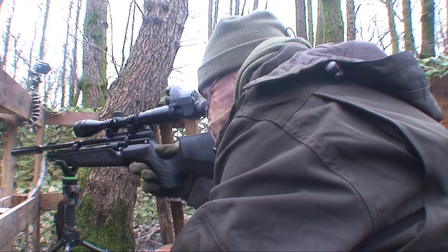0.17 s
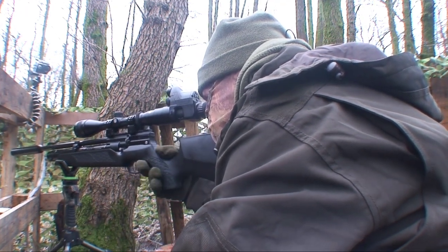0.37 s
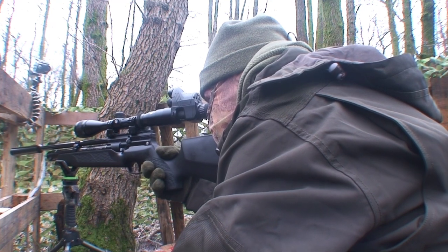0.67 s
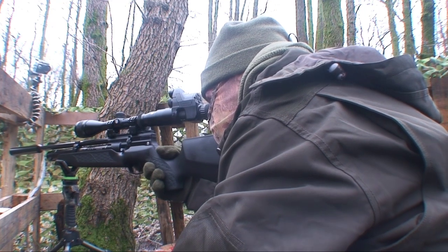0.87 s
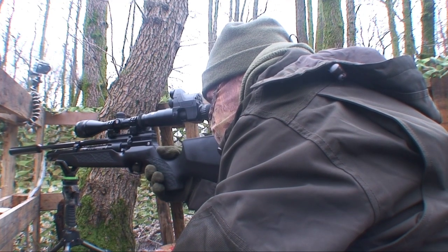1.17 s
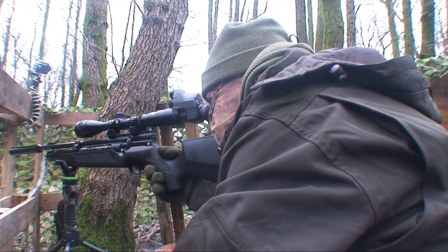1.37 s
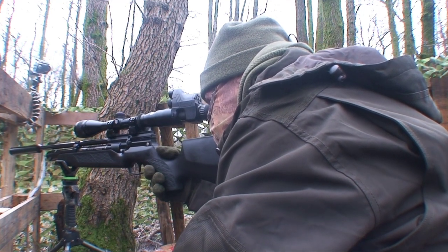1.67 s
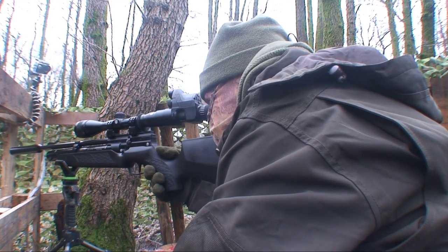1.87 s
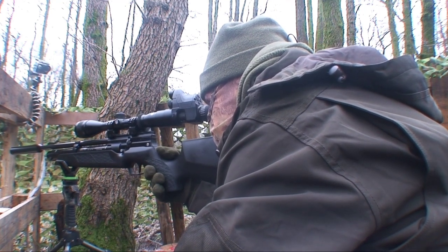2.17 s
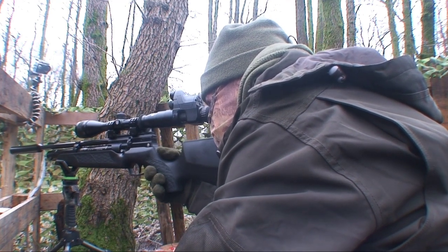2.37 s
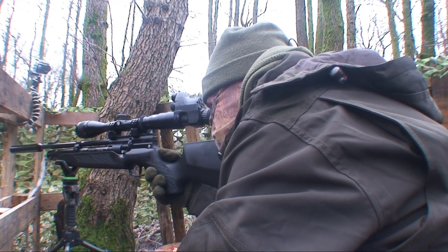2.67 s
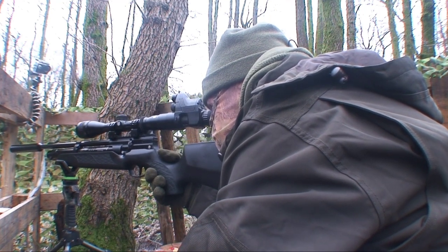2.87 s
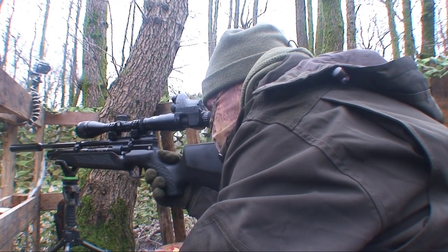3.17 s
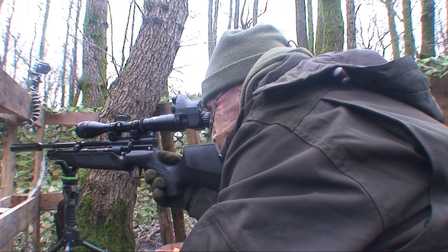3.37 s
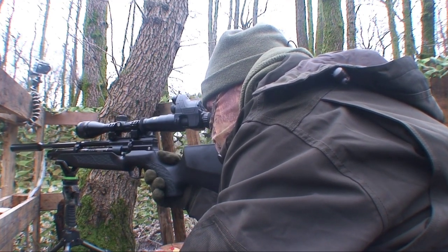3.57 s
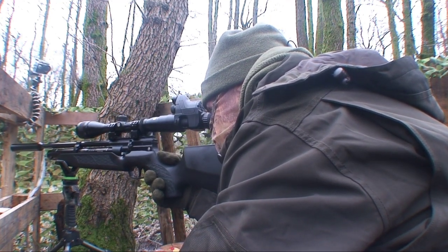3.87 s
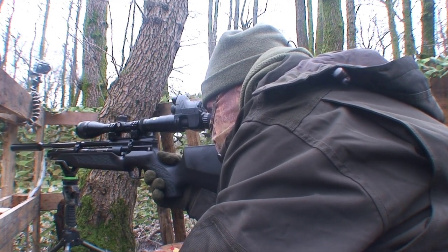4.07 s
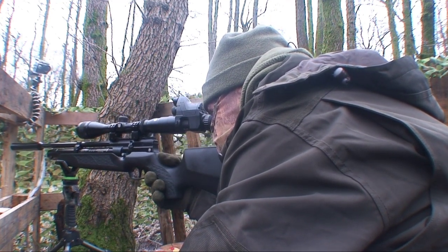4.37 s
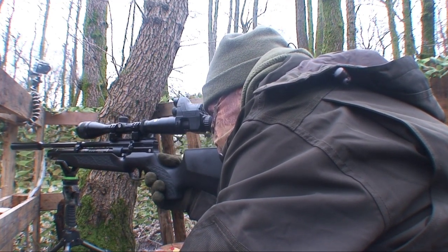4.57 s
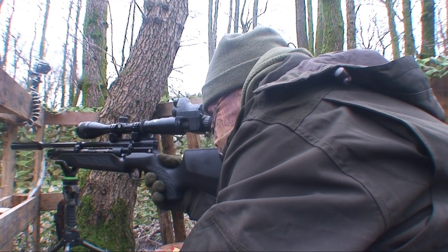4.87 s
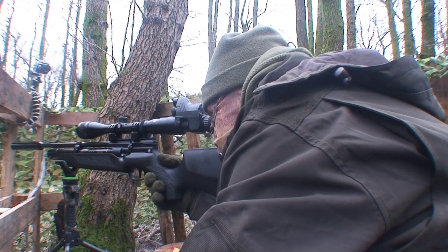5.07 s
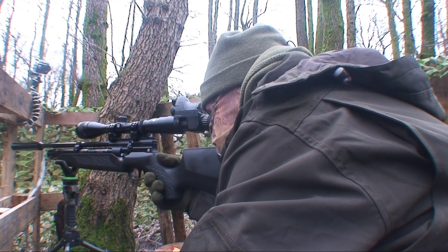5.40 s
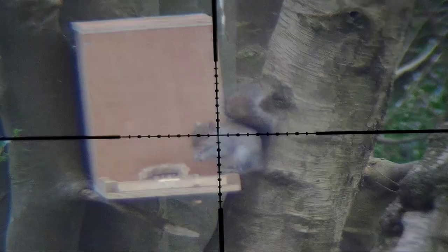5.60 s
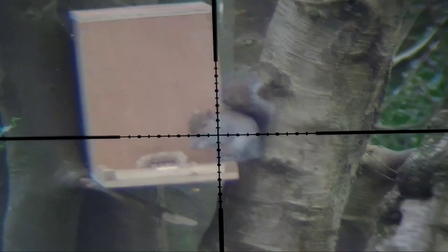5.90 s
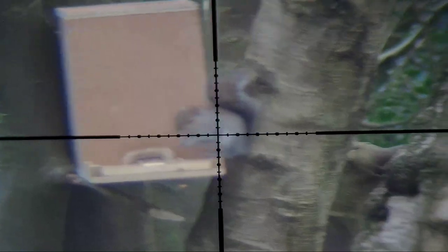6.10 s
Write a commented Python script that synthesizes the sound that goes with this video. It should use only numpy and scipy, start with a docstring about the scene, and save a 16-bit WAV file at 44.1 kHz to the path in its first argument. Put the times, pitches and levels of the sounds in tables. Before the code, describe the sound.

In still woodland, a soft distant roar and leafy hiss surround small birds: thin rasps, bright whistles, quick chirps and a scolding churr, busiest in the first two and a half seconds, echoing lightly among trunks. Then it grows sparse. Near the end the wide stereo air drops to a quieter, close mono microphone on an air rifle, whose action rattles, snaps loudly and ticks.

```python
"""First a far roar and leaf hiss in still woodland, with small birds whistling, buzzing and churring.
Near the end the sound fades quickly to a mono microphone fixed on an air rifle: quieter air, a faint
electronic whine, and the action ticking, snapping and rattling. Air is shaped noise, birds are gliding
tones scattered by tree trunks, and the rifle is clicks and noise ringing parts of metal and stock."""
import sys
import numpy as np
from scipy import signal
from scipy.fft import rfft, irfft, next_fast_len
from scipy.io import wavfile

SR = 44100
rng = np.random.default_rng(int(sys.argv[2]) if len(sys.argv) > 2 else 0)


def store_pcm(level_fs):
    """Save levels as 16-bit WAV."""
    pcm = np.round(np.clip(level_fs, -1, 1) * 32767).astype(np.int16)
    wavfile.write(sys.argv[1], SR, np.atleast_2d(pcm).T)


N = 275184

# Woodland air over time: start_s, roar_db, treble_swell_db (around the average roar)
AIR_LEVELS = [(0.0, -41.5, 3), (0.53, -40, 1.5), (2.16, -41.5, 2), (2.75, -40.5, 1.5), (4.26, -42, 0),
              (4.66, -42, 0), (5.59, -42, 2.5), (5.75, -42, 1.5)]
# Tone of the woodland air: pitch_hz, level_db (per Hz, relative)
AIR_TONE = [(15, -39), (25, -15), (45, -0.5), (100, -4), (190, -4.5), (380, -10), (560, -11.5), (800, -9),
            (1300, -14.5), (1800, -20), (2500, -26), (3500, -32.5), (6500, -38), (10000, -38.5),
            (15800, -44.5)]
# How alike left and right are in the air: pitch_hz, likeness (1 = the same)
AIR_LIKENESS = [(60, 0.32), (150, 1), (380, 0.898), (950, 0.85), (2380, 0.74), (5980, 0.82), (15000, 1)]
# Left level minus right level in the air: pitch_hz, lean_db
AIR_LEAN = [(60, -0.5), (180, -2), (550, -3.5), (1650, -3.5), (4970, -1.5), (15000, 0.5)]
# Distant engines humming in the roar: pitch_hz, width_hz, level_db (rms, before the lean)
ENGINE_HUMS = [(53.6, 9.1, -54), (109.6, 9.3, -53), (277.2, 16, -55), (318.4, 9.3, -57), (437.6, 32.2, -57)]
# Far flock, too distant for single notes: start_s, level_db (before the scatter)
FLOCK_LEVELS = [(0, -90), (.5, -69), (1.5, -74), (2.3, -70), (3.4, -74), (3.7, -75), (4.4, -71),
                (4.9, -83.5), (5.1, -71), (5.75, -71)]
# Echoes of the near birds: delay_s, level_db
BIRD_ECHOES = [(.029, -12), (.054, -13.5)]
# Clear notes: start_s, length_s, first_hz, last_hz, bend (under 1 glides early, over 1 late),
# level_db (mid-note), swell_db (start to end)
CLEAR_NOTES = [(0.082, .12, 7180, 6500, 4.34, -64, 0), (.32, 0.079, 6750, 6400, 1.5, -68.5, 2),
               (0.717, 0.033, 7500, 7430, 1.1, -65, 10.5), (.8, 0.148, 7316, 7153, 1.06, -63.5, -6),
               (.79, 0.037, 5360, 5270, 1.1, -64.5, 0), (0.986, 0.055, 3480, 4700, 5.2, -45.5, 5),
               (1.025, .035, 7730, 7300, 1.1, -62.5, -5), (1.103, 0.091, 3526, 4043, 0.426, -45, 8),
               (1.344, 0.083, 3914, 3910, 1, -53, -1.5), (1.42, 0.098, 4204, 4214, 1.2, -60, -12),
               (1.335, 0.07, 4050, 4256, 0.66, -62, 0), (1.092, .015, 4350, 4460, 1, -51, 0),
               (1.463, 0.1205, 6900, 6277, 7.8, -48, 4.5), (1.552, .05, 7000, 6960, 1.1, -63, -15),
               (1.979, 0.0252, 3200, 3170, 1.1, -60, -5), (1.995, .02, 4700, 4710, 1.1, -62, 0),
               (2.083, 0.0174, 3910, 3170, 1.19, -43, -7), (2.098, 0.0143, 3160, 3927, 1.14, -43, -2.5),
               (2.145, 0.053, 8500, 8350, 1.24, -65, 5), (2.168, 0.0213, 4162, 4415, 0.64, -49.5, 5),
               (2.197, .017, 4060, 3800, 1.1, -46.5, -9), (2.213, 0.0224, 5500, 4770, 0.616, -45, 10),
               (2.317, 0.0194, 5450, 4950, 1.07, -56, 0), (2.325, 0.0124, 3560, 3100, 1.1, -50, 3),
               (2.335, 0.016, 3030, 3650, 1.5, -48, -4), (2.33, 0.136, 8170, 7800, 0.58, -65.5, -5),
               (2.411, 0.031, 3142, 4000, 3, -57.5, -2), (2.372, .012, 3900, 3800, 1, -55.5, 0),
               (2.557, .07, 3950, 3770, 1.2, -64.5, -6), (3.64, .17, 5360, 5395, 0.49, -73, -2),
               (3.861, 0.076, 4410, 4380, 1.1, -67.5, 3), (4.06, .12, 7560, 6640, 2.5, -72, 7.5),
               (5.083, .12, 2439, 2330, 0.31, -59.5, 8)]
# Notes with a fast warble, and two faint stretches of thin high hiss near 10 kHz:
# start_s, length_s, first_hz, last_hz, level_db (midway), swell_db (start to end), swing_hz
BUZZES_AND_HISS = [(0.963, 0.0497, 5480, 5360, -59.5, -8, 200), (1.11, 0.099, 4300, 4850, -59, 3, 200),
                   (1.555, 0.11, 7630, 8550, -54.5, 5, 180), (1.7, 0.083, 8500, 8900, -61, -19.5, 220),
                   (1.842, 0.091, 9100, 8870, -67.5, 7, 150), (2.0, .9, 9800, 9645, -74, -2, 400),
                   (2.109, .03, 4404, 4216, -57.5, -4, 150), (2.16, 0.147, 3600, 4418, -58.5, 0, 300),
                   (2.455, .1, 3230, 3542, -64, 2, 100), (4.348, .11, 5725, 5820, -69.5, -8, 200),
                   (5.03, 0.24, 3866, 3680, -70, -4, 150), (5.02, 0.077, 7700, 7830, -72.5, 3, 250),
                   (5.3, 0.407, 9900, 10110, -70, 0, 700), (5.5, 0.17, 7600, 7560, -69.5, -1, 200)]
# Loud rasps, each a short drop then a rising buzz: start_s, level_db
RASP_CALLS = [(.39, -51), (3.934, -53)]
# A scolding syllable, repeated: start_s, level_db
CHURR_CALLS = [(1.675, -47.5), (1.793, -48.5), (1.903, -49.5), (2.042, -52), (2.985, -72), (3.1, -66),
               (3.225, -62.5), (3.335, -63.5)]
# Strokes in that syllable: start_s, length_s, first_hz, last_hz, level_db (relative to the call)
SYLLABLE_STROKES = [(0., 0.028, 2640, 2750, -13.5), (0., 0.017, 3170, 3633, -11),
                    (0., 0.028, 5100, 5470, -9.5), (.008, 0.021, 6150, 6450, -4.5),
                    (0.019, 0.016, 3700, 5800, -10), (.028, 0.012, 5860, 6930, 2.5),
                    (0.029, 0.023, 3786, 5209, -11.5), (0.035, 0.014, 5241, 5450, -7),
                    (0.035, .016, 6733, 7055, -3.5), (0.041, .011, 6100, 6800, -9)]
# A small dry tick: start_s, peak_db (before echo and scatter)
DRY_TICK = (3.312, -40)
# Tone of the air at the rifle: pitch_hz, level_db (per Hz, relative)
CLOSE_AIR_TONE = [(24, -23), (45, 5.5), (100, -6), (470, -13.5), (1500, -26.5), (3400, -35), (7500, -37),
                  (11000, -32.5), (13400, -30), (14600, -38.5), (15200, -65)]
# Electronic whine: pitch_hz, level_db (rms)
WHINE_TONES = [(4032, -73.5), (8064, -78)]
# Blows in the action: start_s, bright_db, body_db, thump_db (before a 6 dB cut), crack_db,
# chatter_s, first_contact (size, 0-1)
ACTION_BLOWS = [(5.876, -40, -33, -36, -28, 0.00205, 1), (5.8862, 8, -3.5, 4, -22, 0.003, 0.95),
                (5.9205, -50, -30, -35, -45, .002, 0.55), (5.923, -26, -26, -25, -13.5, 0.0025, 0.2),
                (5.971, -15, -43, -27, -9, 0.0012, 0.88), (5.9743, -43, -37, -27, -37, .002, 1),
                (6.0956, -31, -38, -51, -39, .004, 0.31), (6.114, -30.5, -37.5, -58.5, -39, .004, 0.25),
                (6.1208, -38, -31, -48, -45, .004, 0.27)]
# Ringing modes of stock and microphone mount, bright group: pitch_hz, width_hz, level_db
BRIGHT_MODES = [(5500, 500, -16), (6080, 260, 0), (6630, 200, -9), (8180, 250, -18)]
# Ringing modes of stock and microphone mount, body group: pitch_hz, width_hz, level_db
BODY_MODES = [(1370, 126.5, -6.5), (1720, 170, -8), (2703, 81.7, -12.5), (3400, 510, -9),
              (4363, 158, -10.5), (4700, 190, -18)]
# Low thump modes: pitch_hz, width_hz, level_db
THUMP_MODES = [(330, 114, -7), (450.5, 167, -1.5), (660, 364, -1), (880, 170, -11)]
# Dull, well-damped crack modes: pitch_hz, width_hz, level_db
CRACK_MODES = [(3010, 590, -9), (4980, 500, -12), (5850, 900, -2.5), (8000, 600, -18)]
# Spells of loose parts rattling: start_s, loudest_s, stop_s, bright_db, low_db
RATTLE_SPELLS = [(5.801, 5.872, 6, -44.4, -42), (5.968, 5.975, 5.993, -54.5, -38.5),
                 (5.996, 5.997, 6.003, -43, -60.5), (6.093, 6.096, 6.125, -49, -52.5)]
# Tone of the bright rattle: pitch_hz, level_db (relative)
RATTLE_TONE = [(1400, -33), (2100, -15), (2750, 3.5), (3400, -10.5), (4300, -4.5), (5300, -13.5),
               (6100, -4), (6900, -14), (8400, -12)]
# Tone of the low rumble: pitch_hz, level_db (relative)
RUMBLE_TONE = [(100, 0), (300, -2), (450, 6.5), (650, -16), (900, 1), (1200, -2.5), (1600, -17),
               (3000, -39.5)]

FLOCK_LOW_HZ, FLOCK_HIGH_HZ, FLOCK_NOTE_S = 3278, 5274, 0.06
TRUNK_T60_S, TRUNK_DB = 0.54, -5   # time to die by 60 dB; near birds' share of the scatter
TRUNK_LUMPY_DB = 3   # the scatter arrives in clumps
ECHO_BLUR_S, BIRD_LEAN_DB = 0.008, -2   # the lean is left minus right
WAVER, FLUTTER_DB = 0.007, 2.8   # unsteadiness of every note: share of its pitch, and level
LILT, LILT_PER_S = 0.011, 27   # slow undulation of the clear notes: share of pitch, rate
WARBLE_PER_S, CHURR_SWING_HZ = 230, 200
RASP_DROP_S, RASP_RISE_S = 0.027, 0.04554
RASP_TOP_HZ, RASP_LOW_HZ, RASP_SWING_HZ = 8530, 8054, 590
CLOSE_AIR_DB = -53
RING_LAG_S = 0.00042   # the metal rings just after the push
RATTLE_PER_S, RATTLE_UNEVEN_DB = 14000, 1.8   # contacts of the loose parts
RATTLE_RISE_DB, RATTLE_STOP_DB_PER_S = 21, 1600
RATTLE_SAG_DB_PER_S, RUMBLE_SAG_DB_PER_S = 10, 73.5
ACTION_TOP_HZ = 8160   # top of the action's treble
OVERLOAD, CAPSULE_TOP_HZ = 0.66, 11000   # soft ceiling of the wave; start of the treble roll-off
CUT_S, CUT_FADE_S = 5.765, 0.02   # the change of microphone
CUTOFF_HZ = 15500


def from_db(db):
    """Turn decibels into gain."""
    return 10 ** (np.asarray(db) / 20)


def rms_one(x):
    """Scale to an rms level of 1."""
    return x / np.sqrt(np.mean(x ** 2) + 1e-20)


def at_hz(points, hz):
    """Read a table between its pitches, which are spaced as the ear hears them (log scale)."""
    pitches, values = np.array(points).T
    return np.interp(np.log(hz), np.log(pitches), values)


def drift(rate_hz):
    """Random wander of spread 1, made by smoothing noise at one point per 40 samples."""
    r = np.exp(-80 * np.pi * rate_hz / SR)
    white = rng.standard_normal(N // 40 + 2002)
    slow = signal.lfilter([1], [1, -2 * r, r * r], white)[2000:]   # drop the settling-in
    return np.interp(np.arange(N) / 40, np.arange(len(slow)), rms_one(slow))


def coloured(tone, source):
    """Shape noise or clicks to a tone table, at rms 1."""
    hz = np.maximum(np.arange(len(source) // 2 + 1) * SR / len(source), 1)
    return rms_one(irfft(rfft(source) * from_db(at_hz(tone, hz)), len(source)))


def resonate(x, modes):
    """Ring several modes side by side; a wider mode dies away sooner."""
    out = 0
    for hz, width_hz, level_db in modes:
        r, w = np.exp(-np.pi * width_hz / SR), 2 * np.pi * hz / SR
        ring = signal.lfilter([0, np.sin(w)], [1, -2 * r * np.cos(w), r * r], x)
        out = out + from_db(level_db) * ring
    return out


def add(track, start_s, sound):
    """Mix a sound into a track."""
    i = round(start_s * SR)
    track[i:i + len(sound)] += sound[:len(track) - i]


def lean(lean_db):
    """Left and right gains for a given level difference."""
    return from_db(np.array([[.5], [-.5]]) * lean_db)


def air(patchy_db):
    """Half-octave bands of stereo noise; the roar sets the lows, the hiss swell lifts the treble."""
    start_s, roar_db, hiss_db = np.transpose(AIR_LEVELS)
    t = np.arange(N) / SR
    roar, hiss = np.interp(t, start_s, roar_db), np.interp(t, start_s, hiss_db)
    white = coloured(AIR_TONE, rng.standard_normal(2 * N)).reshape(2, N)
    size = next_fast_len(N)
    spectra, hz = rfft(white, size), np.arange(size // 2 + 1) * SR / size
    edges = 22 * 2 ** np.arange(0, 9.9, .5)
    out = 0
    for low, high in zip(edges, edges[1:]):
        shared, opposed = irfft(spectra * ((hz >= low) & (hz < high)), size)[:, :N]
        centre = np.sqrt(low * high)
        alike = np.clip(at_hz(AIR_LIKENESS, centre), -1, 1)
        treble = np.clip(np.log2(centre / 2500) / 1.69, 0, 1)   # 0 follows the roar, 1 the hiss
        level_db = roar - treble * (roar - roar.mean() - hiss) + patchy_db * drift(9.5)
        pair = np.sqrt(1 + alike) * shared + np.sqrt(1 - alike) * opposed * [[1], [-1]]
        # the 3.5 dB cut roughly undoes the gain of adding the two noises
        out = out + from_db(level_db - 3.5) * pair * lean(at_hz(AIR_LEAN, centre))
    return out


def drone():
    """Distant engines: noise rung through narrow low resonances."""
    out = 0
    for hz, width_hz, level_db in ENGINE_HUMS:
        hum = resonate(rng.standard_normal(N), [(hz, width_hz, 0)])
        out = out + from_db(level_db) * rms_one(hum)
    return out


def note(length, from_hz, to_hz, level_db, swell_db=0, bend=1, swing_hz=0, lilt=0, edge_s=0.0058):
    """A slightly unsteady gliding tone, as from a bird's voice, warbled if it has a swing."""
    t = np.arange(0, length, 1 / SR)
    knots = np.arange(0, length + .004, .004)   # a new random value every 4 ms
    waver, flutter, lurch = (np.interp(t, knots, draw) for draw in rng.standard_normal((3, len(knots))))
    pitch = from_hz + (to_hz - from_hz) * (t / length) ** bend
    pitch = pitch * (1 + WAVER * waver - lilt * np.cos(2 * np.pi * LILT_PER_S * t))
    pitch = pitch + swing_hz * np.sin(2 * np.pi * WARBLE_PER_S * t + 1.51 * lurch)
    edges = np.clip(np.minimum(t, length - t) / edge_s, 0, 1)
    gain = from_db(level_db + swell_db * (t / length - .5) + FLUTTER_DB * flutter) * edges
    return np.sqrt(2) * gain * np.sin(2 * np.pi * np.cumsum(pitch) / SR)


def flock(count):
    """Many far birds: short random slurs up or down."""
    out = np.zeros(N)
    for when, where, slur in rng.random((count, 3)):
        start_s, hz = when * CUT_S, FLOCK_LOW_HZ + where * (FLOCK_HIGH_HZ - FLOCK_LOW_HZ)
        level_db = np.interp(start_s, *np.transpose(FLOCK_LEVELS))
        add(out, start_s, note(FLOCK_NOTE_S, hz, hz + 600 * (slur - .5), level_db, edge_s=0.0274))
    return out


def trunks(near, far):
    """Trunks scatter sound into a dense dying tail for each ear; far birds arrive by it alone."""
    t = np.arange(SR) / SR
    fade_db = -60 * t / TRUNK_T60_S + TRUNK_LUMPY_DB * drift(50)[:SR]
    tail = rng.standard_normal((2, SR)) * from_db(fade_db) * np.clip(t / 0.0088, 0, 1)
    tail = tail / np.sqrt(np.sum(tail ** 2, axis=1, keepdims=True))
    wet = signal.fftconvolve((from_db(TRUNK_DB) * near + far)[None], tail, axes=1)[:, :N]
    wet = wet + 0.334 * wet[::-1]   # some of the scatter reaches both ears alike
    echo = np.zeros(N)
    for delay_s, level_db in BIRD_ECHOES:
        add(echo, delay_s, from_db(level_db) * near)
    blur = rms_one(rng.standard_normal(round(ECHO_BLUR_S * SR))) / np.sqrt(ECHO_BLUR_S * SR)
    echo = signal.fftconvolve(echo, blur)[:N]
    return (near + echo + wet) * lean(BIRD_LEAN_DB)


def whistles(track):
    """Clear gliding tones with a slow undulation."""
    for start_s, length, from_hz, to_hz, bend, level_db, swell_db in CLEAR_NOTES:
        add(track, start_s, note(length, from_hz, to_hz, level_db, swell_db, bend, lilt=LILT))


def buzzes_and_hiss(track):
    """Tones whose pitch swings too fast to follow: bird buzzes, and faint thin hiss near 10 kHz."""
    for start_s, length, from_hz, to_hz, level_db, swell_db, swing_hz in BUZZES_AND_HISS:
        add(track, start_s, note(length, from_hz, to_hz, level_db, swell_db, swing_hz=swing_hz))


def rasps(track):
    """A short drop in pitch, then a rising buzz with a warble twice as wide."""
    for start_s, level_db in RASP_CALLS:
        drop = note(RASP_DROP_S, RASP_TOP_HZ, RASP_LOW_HZ, level_db, swing_hz=RASP_SWING_HZ / 2)
        rise = note(RASP_RISE_S, RASP_LOW_HZ, RASP_TOP_HZ, level_db, swing_hz=RASP_SWING_HZ)
        add(track, start_s, drop)
        add(track, start_s + RASP_DROP_S - .004, rise)   # overlaps the drop by 4 ms


def churrs(track):
    """Scolding syllables, each built from brief overlapping hoarse strokes."""
    for call_s, call_db in CHURR_CALLS:
        for start_s, length, from_hz, to_hz, level_db in SYLLABLE_STROKES:
            stroke = note(length, from_hz, to_hz, call_db + level_db, swing_hz=CHURR_SWING_HZ, edge_s=0.003)
            add(track, call_s + start_s, stroke)


def dry_tick(track):
    """A small tick: one sample up, one down."""
    start_s, peak_db = DRY_TICK
    add(track, start_s, from_db(peak_db) * np.array([1., -1.]))


def near_sounds():
    """Near birds, thin hiss and the tick, before echo and scatter."""
    track = np.zeros(N)
    for layer in (whistles, buzzes_and_hiss, rasps, churrs, dry_tick):
        layer(track)
    return track


def close_floor(count):
    """Quiet air as shaped noise, and a thin steady whine of the electronics."""
    t = np.arange(count) / SR
    whine = sum(np.sqrt(2) * from_db(level_db) * np.sin(2 * np.pi * hz * t) for hz, level_db in WHINE_TONES)
    return from_db(CLOSE_AIR_DB) * coloured(CLOSE_AIR_TONE, rng.standard_normal(count)) + whine


def blows(count, first_s):
    """Each blow is a click, with chatter for all but the thump, ringing four groups of modes."""
    bright, body, low, crack = np.full((4, count), 1e-18)   # tiny offset instead of pure silence
    for start_s, bright_db, body_db, thump_db, crack_db, length, first_contact in ACTION_BLOWS:
        at_s = start_s - first_s
        burst = np.arange(0, 4 * length, 1 / SR)
        fade = np.exp(-(burst / length) ** 2)
        chatter = .45 * rng.standard_normal(len(burst)) * fade / np.sqrt(length * SR)
        chatter[0] = first_contact
        add(crack, at_s + RING_LAG_S, from_db(crack_db) * chatter)
        add(bright, at_s + RING_LAG_S, from_db(bright_db) * chatter)
        add(body, at_s, -from_db(body_db) * chatter)
        add(low, at_s, -from_db(thump_db - 6.0) * np.ones(1))
    ringing = resonate(bright, BRIGHT_MODES) + resonate(body, BODY_MODES)
    return ringing + resonate(low, THUMP_MODES) + resonate(crack, CRACK_MODES)


def spell(t, start, loudest, stop, level_db, sag_db_per_s):
    """Gain of one rattling spell: it builds up, sags and stops short."""
    rise_db = RATTLE_RISE_DB * np.maximum(loudest - t, 0) / (loudest - start)
    sag_db = sag_db_per_s * np.maximum(t - loudest, 0)
    stop_db = RATTLE_STOP_DB_PER_S * np.maximum(t - stop, 0)
    return from_db(level_db - rise_db - sag_db - stop_db)


def rattling(t):
    """Loose parts: random contacts make the bright rattle, noise the low rumble."""
    count = len(t)
    loose = sum(spell(t, *when, bright_db, RATTLE_SAG_DB_PER_S) for *when, bright_db, _ in RATTLE_SPELLS)
    heavy = sum(spell(t, *when, low_db, RUMBLE_SAG_DB_PER_S) for *when, _, low_db in RATTLE_SPELLS)
    uneven = from_db(RATTLE_UNEVEN_DB * drift(150)[:count])
    contacts = (rng.random(count) < RATTLE_PER_S / SR) * rng.standard_normal(count)
    rattle = loose * coloured(RATTLE_TONE, contacts)
    rumble = heavy * coloured(RUMBLE_TONE, rng.standard_normal(count))
    return uneven * (rattle + rumble)


def rifle(count):
    """Blows and rattling parts, low-passed to leave out the highest treble."""
    t = (N - count + np.arange(count)) / SR
    action = blows(count, t[0]) + rattling(t)
    return signal.sosfilt(signal.cheby1(8, 1, ACTION_TOP_HZ, fs=SR, output="sos"), action)


def close_microphone(x):
    """The loudest snap overloads it, rounding the peaks; its treble rolls off."""
    clipped = OVERLOAD * np.tanh(x / OVERLOAD)
    return signal.sosfilt(signal.butter(2, CAPSULE_TOP_HZ, fs=SR, output="sos"), clipped)


def scene():
    """The wide stereo wood fades quickly into the close mono microphone."""
    wood = air(patchy_db=0.81) + drone() * lean(-3) + trunks(near_sounds(), flock(count=600))
    count = SR // 2   # the close sound fills the last half second
    close = np.zeros(N)
    close[-count:] = close_microphone(rifle(count)) + close_floor(count)
    after = np.maximum(np.arange(N) / SR - CUT_S, 0) / CUT_FADE_S
    return wood * np.exp(-after) + close * np.clip(after, 0, 1)


def record(dry):
    """A steep filter removes the highest treble."""
    return signal.sosfilt(signal.ellip(12, .2, 70, CUTOFF_HZ, fs=SR, output="sos"), dry)


dry = scene()
out = record(dry)
store_pcm(out)
```